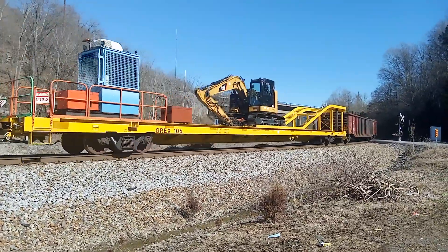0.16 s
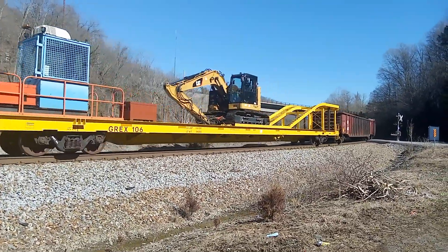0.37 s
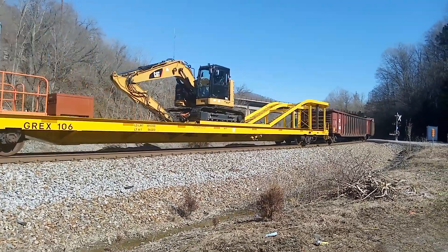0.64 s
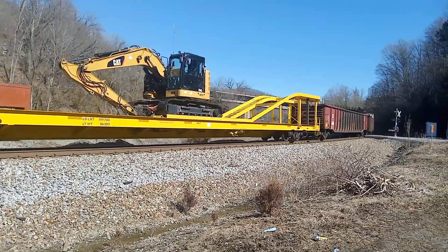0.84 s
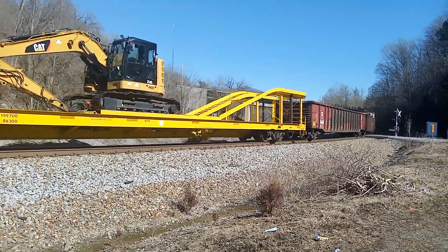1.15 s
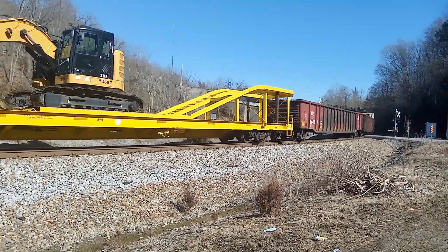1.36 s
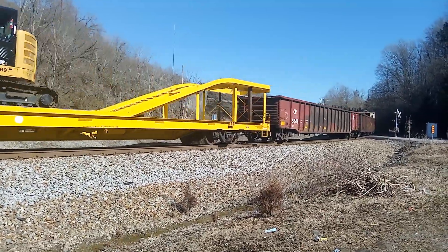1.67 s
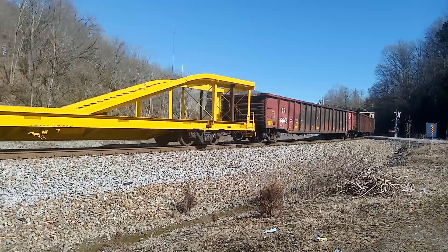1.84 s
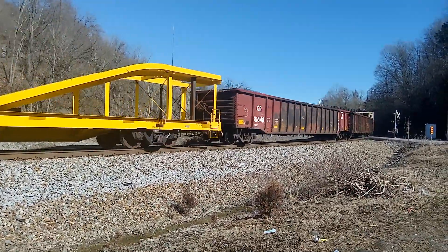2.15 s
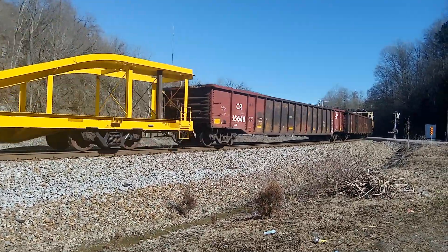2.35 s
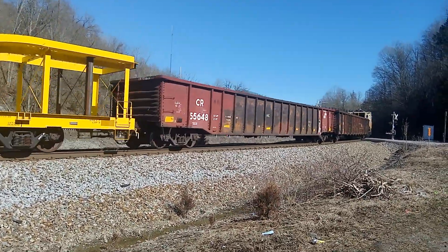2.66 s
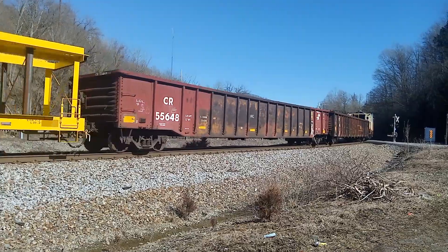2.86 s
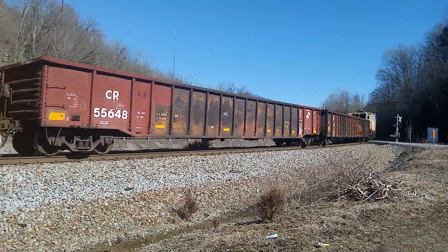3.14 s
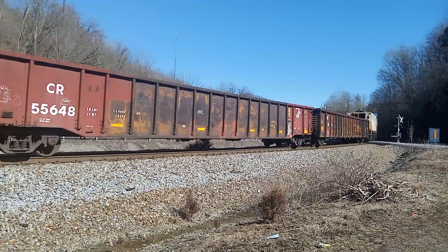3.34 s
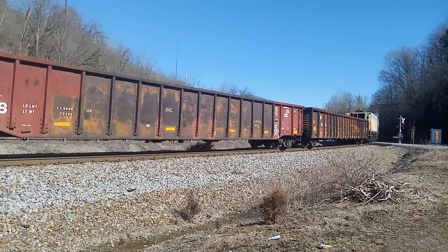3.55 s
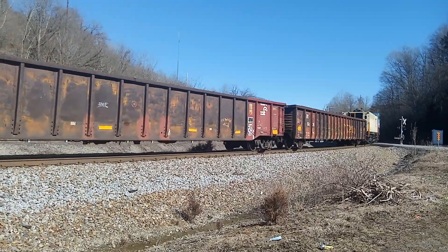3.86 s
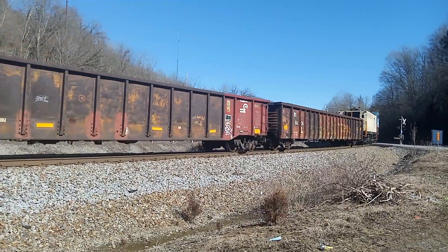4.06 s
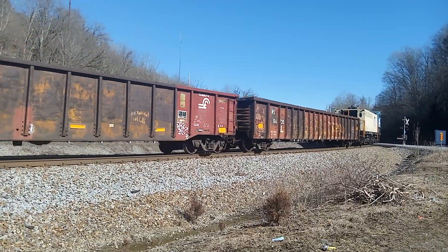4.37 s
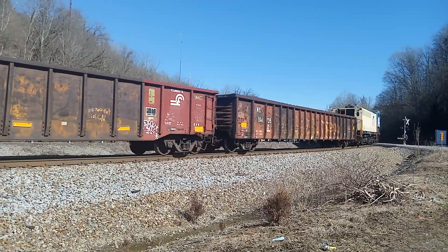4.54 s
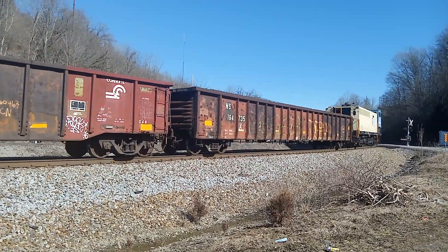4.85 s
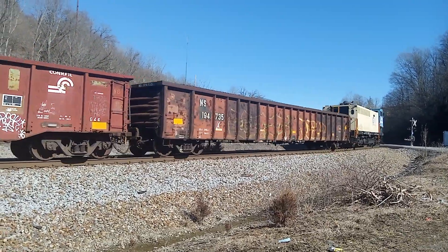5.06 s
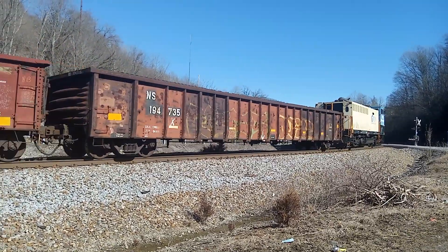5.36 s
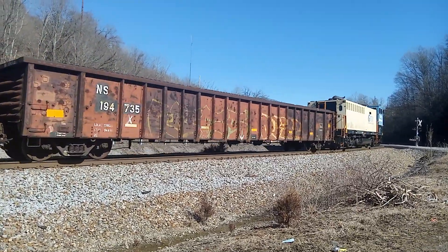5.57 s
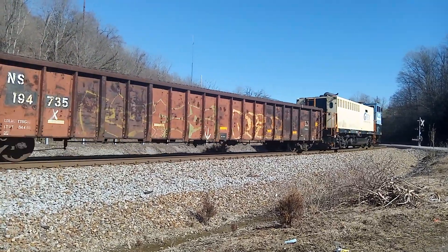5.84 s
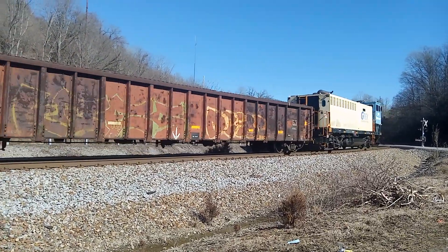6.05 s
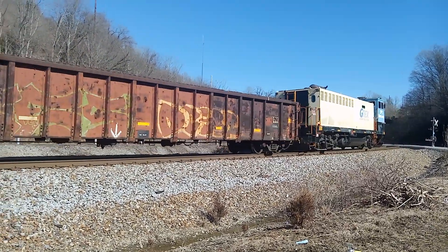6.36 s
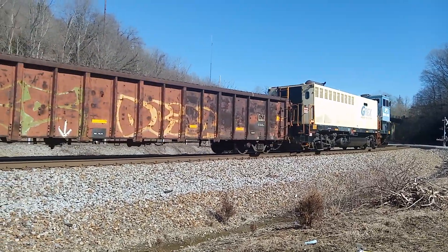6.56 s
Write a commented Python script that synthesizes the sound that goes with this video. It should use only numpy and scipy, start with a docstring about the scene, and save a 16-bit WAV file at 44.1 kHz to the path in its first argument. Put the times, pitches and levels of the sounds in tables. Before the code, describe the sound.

Outdoors beside a curved track, a freight train rolls by at moderate speed. From 0 to 0.4 s a flange scrapes harshly, ringing many metallic pitches with brief high singing tones; dull double knocks follow at about 0.6 s. A second scrape at 1.0 to 1.5 s rings out slowly. Throughout, a very high, piercing wheel squeal near 5 kHz pulses in quick swells and nulls, growing from 2 s and fiercest from 3.3 to 4.7 s, with another burst at 5.3 s. There it overloads the microphone, adding brittle overtones and crackle, and its pitch slides slightly down as it passes. A rough low howl near 435 Hz judders in short bouts, strongest from 3 to 5.5 s. Quiet rumble, rolling roar and fading hiss lie beneath, with soft booming jolts and firmer knocks near 6.4 s. The squeal continues to the end at 6.7 s.

```python
"""A wheel squeals near 5 kHz as a freight train passes on a curve: one stick-slip mode, Doppler-shifted,
swept by radiation lobes and scattered by the hillside and car sides. In shrill bursts it overloads the
microphone, adding overtones and crackle. A low wheel mode howls in bouts, two flange scrapes ring many modes,
and single modes sing briefly. Shaped noise makes the rumble and roar of the cars and a high background hiss;
decaying booms and clatter make the knocks."""
import sys
import numpy as np
from scipy import signal
from scipy.fft import rfft, irfft, next_fast_len
from scipy.io import wavfile
from scipy.ndimage import uniform_filter1d, map_coordinates

SR = 44100
rng = np.random.default_rng(int(sys.argv[2]) if len(sys.argv) > 2 else 0)


def log_audio(samples):
    """Write samples as a 16-bit WAV file to the path given in sys.argv[1]."""
    # one column per channel
    frames = np.atleast_2d(samples).T
    # limit to full scale, then quantise
    limited = np.clip(frames, -1, 1)
    pcm = np.round(limited * 32767).astype(np.int16)
    wavfile.write(sys.argv[1], SR, pcm)


N = 295911
SOUND_SPEED_M_S, TRAIN_SPEED_M_S = 343, 9.9
CONVERTER_RATE_HZ = 48000
SQUEAL_HZ, HOWL_HZ = 5033, 435.4  # at the source; the howl is the wheel's lowest mode
SQUEAL_ABREAST_S, SQUEAL_DISTANCE_M = 3.87, 13.5

# shrill bursts of the squeal: start_s, end_s, level_db (of the whistle, before flicker)
SHRILL_BURSTS = [(2.104, 2.144, -41), (2.342, 2.361, -41.5), (2.853, 2.884, -37), (2.988, 3.098, -31),
                 (3.115, 3.149, -25.5), (3.223, 3.423, -28.5), (3.441, 3.497, -35.5), (3.524, 3.635, -25),
                 (3.656, 3.82, -27.5), (3.868, 3.951, -30), (3.978, 4.117, -28), (4.137, 4.261, -29.5),
                 (4.305, 4.432, -32), (4.497, 4.529, -34.5), (4.605, 4.621, -38.5), (4.695, 4.753, -34.5),
                 (5.219, 5.247, -41), (5.309, 5.363, -29.5), (6.136, 6.146, -40.5)]


def amp(db):
    """Decibels to gain."""
    return np.exp(np.asarray(db) * np.log(10) / 20)


def unit(x):
    """Scale to rms 1."""
    return x / np.sqrt(np.mean(np.abs(x) ** 2) + 1e-20)


def clock():
    """Time of every sample, s."""
    return np.arange(N) / SR


def curves(rows):
    """One value per sample for each column after the time."""
    time_s, *columns = np.transpose(rows)
    return [np.interp(clock(), time_s, column) for column in columns]


def colour(points):
    """Gain as a function of frequency, from (Hz, dB) points on a log axis."""
    f_hz, db = np.transpose(points)
    return lambda hz: amp(np.interp(np.log(np.abs(hz) + 1), np.log(f_hz + 1), db))


def filtered(x, response):
    """x times a response of frequency."""
    size = next_fast_len(N + SR // 4)
    spectrum = rfft(x, size) * response(np.fft.rfftfreq(size, 1 / SR))
    return irfft(spectrum, size)[:N]


def wobble(rate_hz, size=N):
    """Smooth random curve, rate_hz knots a second."""
    knots = rng.standard_normal(int(size / SR * rate_hz) + 4)
    coarse = np.arange(0, size + 16, 16)
    return np.interp(np.arange(size), coarse, map_coordinates(knots, [coarse * rate_hz / SR]))


def flutter(rate_hz, size=N):
    """Random complex gain of rms 1: strength and phase both wander."""
    return unit(wobble(rate_hz, size) + 1j * wobble(rate_hz, size))


def rush(response, patchy_db):
    """Coloured noise of rms 1 with time-frequency patches of random gain."""
    z = signal.stft(rng.standard_normal(N), nperseg=512)[2]
    field = uniform_filter1d(rng.standard_normal(z.shape), size=4, axis=0)
    field = uniform_filter1d(field, size=10, axis=1)
    noise = signal.istft(z * amp(patchy_db * unit(field)), nperseg=512)[1][:N]
    return unit(filtered(noise, response))


def tone(cycles, gain):
    """Sine with a complex gain, of rms 1 at gain 1."""
    return np.sqrt(2) * np.real(gain * np.exp(2j * np.pi * cycles))


def pass_by(abreast_s, distance_m):
    """Elapsed source time (Doppler), s, and nearness 0-1 of a wheel on the track."""
    ahead_m = TRAIN_SPEED_M_S * (clock() - abreast_s)
    reach_m = np.hypot(ahead_m, distance_m)
    receding_m_s = TRAIN_SPEED_M_S * ahead_m / reach_m
    elapsed_s = np.cumsum(1 / (1 + receding_m_s / SOUND_SPEED_M_S)) / SR
    return elapsed_s, distance_m / reach_m


def rolling():
    """Rumble and roar of the cars, and a high background hiss, all patchy coloured noise."""
    # time_s, rumble_db, hiss_db
    levels = [(0, -51, -41), (0.75, -47, -48), (1.7, -52.5, -42.5), (2.6, -49.5, -51.5), (3.5, -53, -44),
              (4.3, -52.5, -47.5), (5.2, -49.5, -56), (6.71, -46.5, -65.5)]
    # spectra: frequency_hz, relative level_db_per_hz
    rumble_colour = [(20, -31.5), (40, -25), (75, 3.5), (110, 1.5), (170, 4), (230, -0.5), (300, -18),
                     (1500, -65)]
    roar_colour = [(150, -14), (330, -2.5), (650, 1), (1050, -5.5), (2000, -4.5), (3300, -10),
                   (4300, -20.5), (6000, -25), (9000, -55)]
    hiss_colour = [(2500, -22), (4500, 5), (6000, 0.5), (7700, -4.5), (9000, -9), (12000, -15), (14000, -9),
                   (15300, -4.5), (16000, -13)]
    train_roar_db, near_bogie_roar_db = -52.5, -49.5
    near = pass_by(abreast_s=3.6, distance_m=5)[1]
    rumble_db, hiss_db = curves(levels)
    rumble = amp(rumble_db + 1.5 * wobble(23)) * rush(colour(rumble_colour), patchy_db=4.0)
    roar_gain = np.hypot(amp(train_roar_db), amp(near_bogie_roar_db) * near ** 2) * amp(wobble(11))
    roar = roar_gain * rush(colour(roar_colour), patchy_db=1.8)
    hiss = amp(hiss_db) * rush(colour(hiss_colour), patchy_db=4.5)
    return rumble + roar + hiss


def knocks(t60_s=0.43, rise_s=0.054, spread_hz=85, clatter_db=-9, clatter_t60_s=0.14):
    """Bogies and couplers jolt the car bodies: a short clatter over a dull boom."""
    # start_s, level_db, boom_hz
    jolts = [(0.61, -39, 213), (0.682, -34, 149.7), (1.949, -43.5, 191.6), (3.469, -45, 114),
             (3.616, -54.5, 255), (3.811, -45.5, 91), (4.307, -39.5, 212), (4.939, -43.5, 112.2),
             (5.251, -41, 100), (5.52, -41.5, 84.6), (6.395, -36, 152), (6.451, -41, 76)]
    # clatter spectrum: frequency_hz, relative level_db_per_hz
    clatter_colour = [(40, -19.5), (250, 1), (900, -9.5), (2500, -21), (7000, -19), (14000, -57.5)]
    t, booms, blows = clock(), np.zeros(N), np.zeros(N)
    body = flutter(spread_hz)
    for start, level_db, hz in jolts:
        on = (t > start - rise_s) & (t < start + t60_s)
        since = t[on] - start
        age = np.maximum(since, 0)
        # the boom swells ahead of the clatter
        shape = amp(level_db - 60 * age / t60_s) * np.minimum(1 + since / rise_s, 1)
        booms[on] += tone(hz * since, shape * body[on])
        blows[on] += (since >= 0) * amp(level_db + clatter_db - 60 * age / clatter_t60_s)
    return booms + blows * rush(colour(clatter_colour), patchy_db=3)


def sings(rise_s=0.016, t60_s=0.12):
    """A wheel mode locks into rough stick-slip for a moment, then rings out."""
    # start_s, end_s, pitch_hz, level_db
    catches = [(-0.05, 0.09, 5680, -26), (-0.05, 0.07, 4805, -35), (-0.05, 0.13, 3884, -33),
               (0.16, 0.25, 5613, -21), (0.16, 0.32, 6486, -24), (0.23, 0.30, 9091, -31),
               (0.25, 0.38, 6062, -36), (0.30, 0.35, 2490, -34), (0.93, 1.09, 3830, -35),
               (1.22, 1.54, 3370, -43), (1.48, 1.61, 3800, -43), (1.46, 1.68, 6390, -44),
               (1.05, 1.23, 7275, -31), (1.14, 1.29, 6356, -31), (1.3, 1.92, 5470, -45),
               (1.3, 2.3, 8870, -52), (4.6, 4.92, 1095, -53)]
    t, out = clock(), np.zeros(N)
    for start, end, hz, level_db in catches:
        on = (t > start - rise_s) & (t < end + t60_s)
        rise = np.clip((t[on] - start + rise_s) / (2 * rise_s), 0, 1)
        ring_out_db = -60 * np.maximum(t[on] - end, 0) / t60_s
        waver = unit(1 + .9 * flutter(70, on.sum()))
        out[on] += tone(hz * t[on], rise * amp(level_db + ring_out_db) * waver)
    return out


def scrape(start, end, level_db, sag_db_per_s, t60_s, modes, attack_s=0.042, grit_db=-7):
    """A flange grinds on the rail head; energy shifts between the modes of its wheel, which then rings out."""
    # grinding spectrum: frequency_hz, relative level_db_per_hz
    grit_colour = [(900, -26.5), (1600, -6.5), (3300, -5.5), (7000, 1), (10000, -18), (15000, -23)]
    size = min(N, int((end + t60_s) * SR))
    t = clock()[:size]
    bite = np.clip(1 + (t - start) / attack_s, 0, 1) * (t < end)
    contact_db = 20 * np.log10(bite + 1e-6) - sag_db_per_s * np.maximum(t - start, 0)
    # the ring follows the contact but falls no faster than its t60
    fall_db = 60 * t / t60_s
    ringing_db = np.maximum.accumulate(contact_db + fall_db) - fall_db
    ring = np.zeros(size)
    for hz, width_hz, mode_db in modes:
        share = amp(mode_db + 4 * wobble(20, size))
        # the sliding contact pulls each mode about
        pitch_hz = hz + .3 * width_hz * wobble(16, size)
        ring += tone(np.cumsum(pitch_hz) / SR, share * (.7 + flutter(1.3 * width_hz, size)))
    grit = rush(colour(grit_colour), patchy_db=4)[:size]
    sound = amp(ringing_db) * unit(ring) + amp(contact_db + grit_db) * grit
    unsteady_db = 0.31 * wobble(70, size) + 0.83 * wobble(14, size)
    return np.pad(amp(level_db + unsteady_db) * sound, (0, N - size))


def scrapes():
    """Two flange scrapes, each ringing the modes of its own wheel."""
    # start_s, end_s, level_db, sag_db_per_s, t60_s
    contacts = [(-0.02, 0.394, -23.5, 9, .41), (0.984, 1.543, -24.5, 25, 1.73)]
    # wheel resonances: pitch_hz, width_hz, relative level_db
    first_wheel = [(1470, 39, -15.5), (1834, 190, -10.5), (2290, 210, -13), (2520, 130, -9.5),
                   (3040, 150, -10.5), (3350, 38, -15), (3874, 90, -7.5), (4340, 56, -17),
                   (4700, 140, -16.5), (5670, 71, -5), (6120, 74, -8.5), (6450, 160, -6.5), (7030, 240, -9),
                   (7400, 390, -17.5), (8260, 140, -11), (9090, 140, -17.5), (9600, 120, -26)]
    second_wheel = [(1295, 150, -19.5), (1600, 170, -11), (1973, 110, -12), (2190, 160, -7.5),
                    (2583, 260, -6.5), (3036, 140, -5), (3460, 330, -5.5), (3814, 150, -9),
                    (4720, 120, -13), (5480, 43, -0.5), (6160, 140, -14), (6080, 110, -10), (7250, 140, -6),
                    (8220, 160, -14), (9300, 260, -26)]
    return sum(scrape(*row, modes) for row, modes in zip(contacts, [first_wheel, second_wheel]))


def bout(start, end, attack_s=.022, release_s=.018, arch_db=5):
    """Envelope of one howl: exponential attack, a top arched by arch_db, exponential release."""
    t = clock()
    off_centre = np.clip((2 * t - start - end) / (end - start), -1, 1)
    edges = np.maximum(start - t, 0) / attack_s + np.maximum(t - end, 0) / release_s
    return amp(-arch_db * off_centre ** 2) * np.exp(-np.minimum(edges, 20))


def howl(rough_far=0.42, rough_near=0.67, rough_rate_hz=85, rattle=0.34, throb_db=2.5):
    """A low wheel mode judders in bouts with two overtones, roughest when it is near."""
    # start_s, end_s, then level before trim: fundamental_db, second_partial_db, third_partial_db
    bout_rows = [(0, 0.338, -47.5, -54.5, -58), (0.905, 1.379, -40.5, -66, -54),
                 (2.093, 2.27, -48, -56.5, -59), (2.285, 2.67, -40.5, -44, -55),
                 (2.737, 2.986, -41, -48.5, -63), (3.009, 3.277, -35.5, -45, -62),
                 (3.43, 3.678, -32, -41.5, -50.5), (3.777, 3.836, -36.5, -51.5, -50.5),
                 (3.976, 4.1, -32, -51, -67.5), (4.123, 4.215, -29, -40, -51),
                 (4.292, 4.311, -24.5, -37.5, -53.5), (4.36, 4.594, -37, -46, -54),
                 (4.648, 4.8, -45, -40.5, -46), (4.834, 4.963, -33, -30, -42.5),
                 (5.101, 5.143, -33, -52.5, -54.5), (5.26, 5.317, -33.5, -49.5, -44),
                 (5.394, 5.467, -34.5, -49.5, -50), (5.551, 5.774, -46.5, -54.5, -52.5),
                 (5.806, 6.063, -47.5, -62.5, -65.5), (6.409, 6.648, -48, -49.5, -46.5)]
    # trim_db of each partial
    partial_trims = [1, 0.7, -0.5]
    idle_db, idle_tilt_db = -53, -8  # floor abreast, before trim; step per partial
    elapsed_s, near = pass_by(abreast_s=3.3, distance_m=8)
    rough = rough_far + rough_near * near ** 3
    cycles = HOWL_HZ * elapsed_s + 0.11 * wobble(18)
    bouts = np.array([bout(start, end) for start, end, *_ in bout_rows])
    out = np.zeros(N)
    for k, (levels_db, trim_db) in enumerate(zip(np.transpose(bout_rows)[2:], partial_trims), 1):
        idle = amp(idle_db + idle_tilt_db * (k - 0.5)) * near ** 2
        strength = np.maximum(idle, amp(levels_db) @ bouts)
        judder = rough * np.sqrt(k) * flutter(rough_rate_hz)
        grip = unit(1 + judder + rattle * near ** 3 * flutter(350))
        out += tone(k * cycles, strength * amp(trim_db + throb_db * wobble(22)) * grip)
    return out


def shrill_gates(edge_s):
    """One row for each shrill burst: 1 while it lasts, with linear edges."""
    t = clock()
    return np.array([np.clip(np.minimum(t - start, end - t) / edge_s + .5, 0, 1)
                     for start, end, _ in SHRILL_BURSTS])


def shrills(rasp_db=-39, seventh_db=-21, ninth_db=-24, crackle_db=-45.5, flicker_db=3.5):
    """In bursts the squeal overloads the microphone: overtones, howl sidebands on the second, folded highs."""
    # crackle spectrum: frequency_hz, relative level_db_per_hz
    crackle_colour = [(1500, -11), (2600, 2), (5000, -4), (8000, -3.5), (10000, 0.5), (12500, -2.5),
                      (15500, 3.5)]
    elapsed_s, near = pass_by(SQUEAL_ABREAST_S, SQUEAL_DISTANCE_M)
    t, cycles = clock(), SQUEAL_HZ * elapsed_s
    gates = shrill_gates(edge_s=.003)
    whistle = (amp(np.transpose(SHRILL_BURSTS)[2]) @ gates) * amp(flicker_db * wobble(45))
    # grit is harshest just before the wheel draws level
    facing = pass_by(abreast_s=3.55, distance_m=SQUEAL_DISTANCE_M)[1]
    grit = gates.sum(axis=0) * facing ** 3 * amp(5.5 * wobble(70))
    overtones = tone(3 * cycles, whistle * (1 + 0.49 * flutter(60)))
    # the highest fold back at the converter's rate
    for order, gain in [(7, amp(seventh_db)), (9, amp(ninth_db) * near ** 6)]:
        folded_cycles = CONVERTER_RATE_HZ * t - order * cycles
        overtones += tone(folded_cycles, gain * whistle * flutter(170))
    sidebands = np.cos(2 * np.pi * HOWL_HZ * elapsed_s)
    rasp = tone(2 * cycles, amp(rasp_db) * grit * sidebands * flutter(120))
    crackle = amp(crackle_db) * grit * rush(colour(crackle_colour), patchy_db=4.5)
    return overtones + rasp + crackle


def scatter():
    """Summed complex gain of many echoes, their Doppler shifts spread around the pitch."""
    # offset_hz from the pitch, relative level_db_per_hz
    spread = [(10, -11.5), (50, -4.5), (130, -5.5), (250, -20), (400, -30), (900, -44), (2000, -96.5)]
    real, imag = (filtered(rng.standard_normal(N), colour(spread)) for _ in range(2))
    return unit(real + 1j * imag)


def sweep(near):
    """Beams sweep past: each lobe builds, drops into a null and flips sign, faster when the wheel is near."""
    lobes_per_s_far, lobes_per_s_added_near = 7, 6
    null_width_far, null_width_near, lobe_scatter = 0.68, 0.39, 0.446  # null softness; scatter in lobes
    build_db, spread_db = 2.5, 1.37  # rise through a lobe; random level wander
    null_fill = 0.31  # far off, the ground reflection partly fills the nulls
    lift_db, hold = 2.5, 0.62  # in a shrill burst: gain, and share that rides over the nulls
    collapse_after_s, collapse_s = .011, 0.0052
    steady_lobes = np.cumsum(lobes_per_s_far + lobes_per_s_added_near * near ** 2) / SR
    lobe = steady_lobes + lobe_scatter * wobble(9) + .5 * wobble(3)
    level_db = build_db * (lobe % 1) + spread_db * wobble(14)
    width = null_width_far * (1 - near ** 2) + null_width_near * near ** 2
    lobes = unit(amp(level_db) * np.tanh(np.sin(np.pi * lobe) / width) / np.tanh(1 / width))
    held = np.clip(shrill_gates(edge_s=0.026).sum(axis=0), 0, 1)
    share = np.clip(np.maximum(hold * held, null_fill * (1 - near ** 2)), 0, 1)
    # the squeal drops out for an instant just after each burst
    collapse = np.prod([np.tanh((clock() - end - collapse_after_s) / collapse_s)
                        for _, end, _ in SHRILL_BURSTS], axis=0)
    return (np.sqrt(1 - share ** 2) * lobes + 1j * share) * amp(lift_db * held) * collapse


def squeal(trim_db=0.22, near_db=-2.0, waver_far=0.09, waver_near=0.57, waver_rate_hz=70,
           echo_db=-25, second_db=-48.5, third_db=-51):
    """Stick-slip holds one wheel mode ringing; its beams sweep past and the moving cars scatter it."""
    # time_s, level_db (before trim, near_db and sweep)
    strength_rows = [(0, -26), (0.25, -27), (0.42, -20.0), (0.62, -27), (0.74, -13.5), (1.08, -21),
                     (1.68, -18), (1.95, -24), (2.2, -15), (2.5, -17.5), (3.0, -13), (3.24, -20),
                     (3.33, -2), (3.48, -12), (3.73, -9), (3.83, -17.5), (3.96, -12.5), (4.04, -7.5),
                     (4.42, -7.5), (4.55, -11.5), (4.74, -11.5), (4.81, -21.5), (4.92, -11.5), (5.25, -12),
                     (5.34, -3.5), (5.43, -26.5), (5.59, -13.5), (5.68, -27), (5.8, -25), (5.88, -10.5),
                     (6.17, -11.5), (6.36, -22), (6.44, -15.5), (6.71, -13)]
    elapsed_s, near = pass_by(SQUEAL_ABREAST_S, SQUEAL_DISTANCE_M)
    cycles = SQUEAL_HZ * elapsed_s
    strength = amp(curves(strength_rows)[0] + trim_db + near_db * near ** 4) * sweep(near)
    waver = 1 + (waver_far + waver_near * near ** 4) * flutter(waver_rate_hz)
    direct = tone(cycles, strength * waver)
    echoes = tone(cycles, amp(echo_db) * near ** 0.8 * scatter())
    second_gain = amp(second_db + 1.8 * wobble(12)) * near ** 2
    second = tone(2 * cycles, second_gain * (flutter(30) + scatter()))
    third = tone(3 * cycles, amp(third_db + 2.5 * wobble(9)) * near ** .6 * scatter())
    return direct + echoes + second + third


def scene():
    """Sum of all layers, one channel."""
    background = rolling() + knocks()
    wheels = sings() + scrapes() + howl()
    return (background + wheels + shrills() + squeal())[None]


def record(dry, ceiling=0.71, hardness=7, smear=0.4, top_hz=15830):
    """The input saturates at the converter's rate, so high overtones fold back; then the band limit."""
    fast = signal.resample_poly(dry[0], CONVERTER_RATE_HZ, SR)
    # a fast limiter takes a share (smear) of the overload before the rest clips
    crest = uniform_filter1d(np.abs(signal.hilbert(fast)), size=96)
    limited = fast * np.maximum(crest / ceiling, 1) ** -smear
    clipped = limited / (1 + np.abs(limited / ceiling) ** hardness) ** (1 / hardness)
    slow = signal.resample_poly(clipped, SR, CONVERTER_RATE_HZ)[:N]
    return filtered(slow, lambda hz: hz < top_hz)[None]


dry = scene()
out = record(dry)
log_audio(out)
```